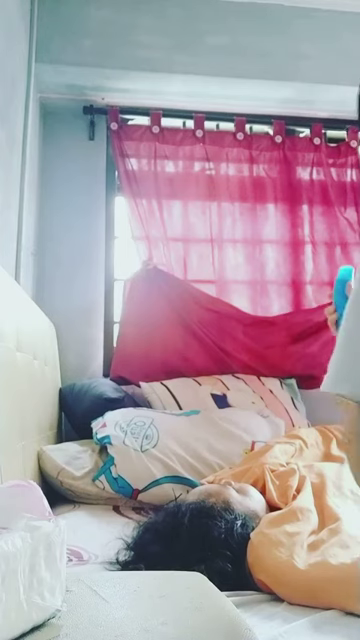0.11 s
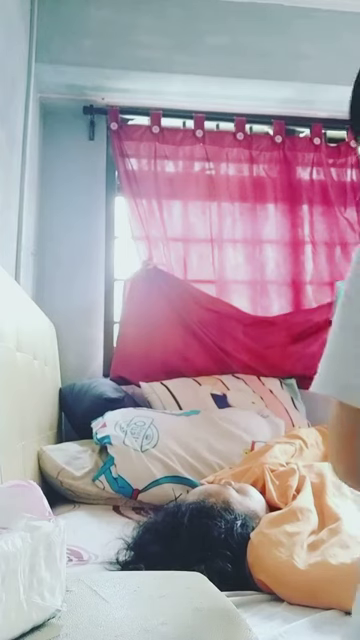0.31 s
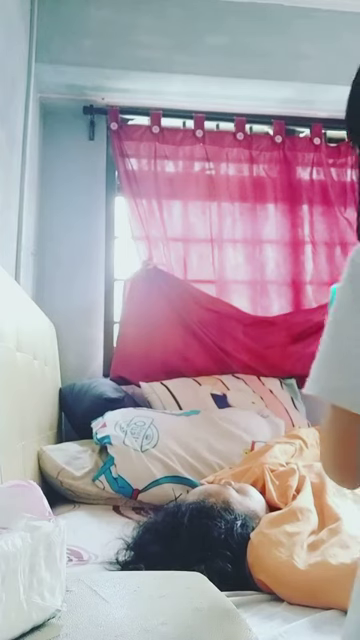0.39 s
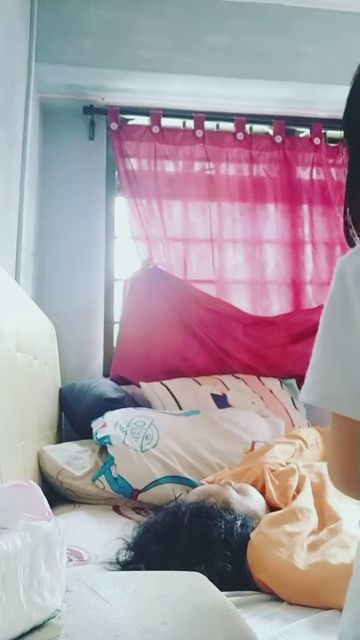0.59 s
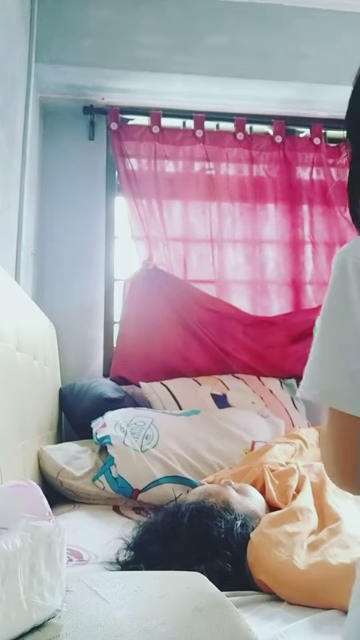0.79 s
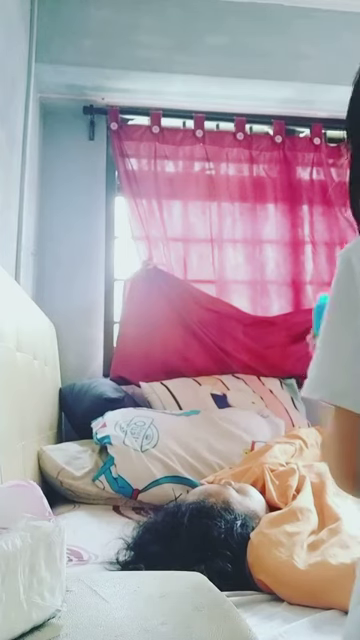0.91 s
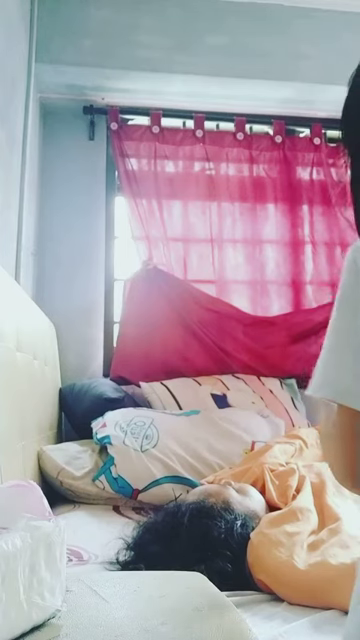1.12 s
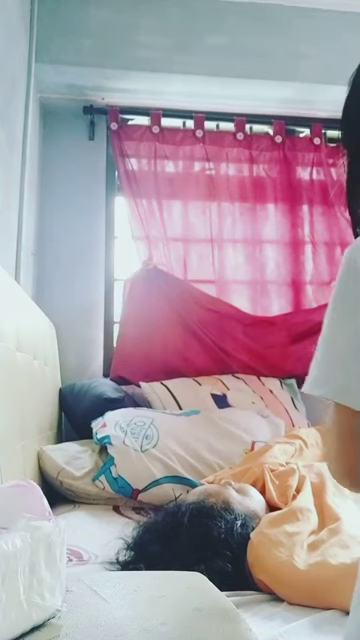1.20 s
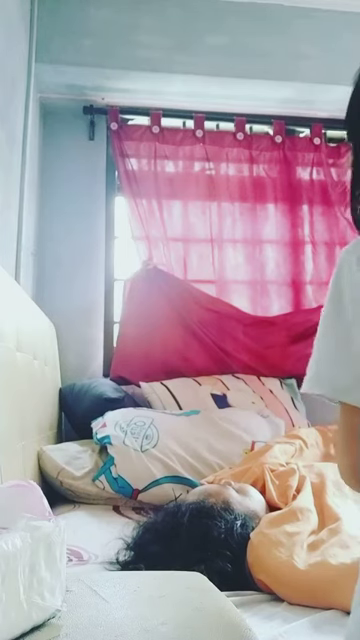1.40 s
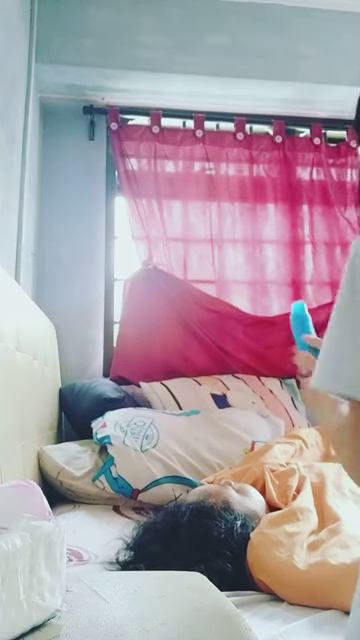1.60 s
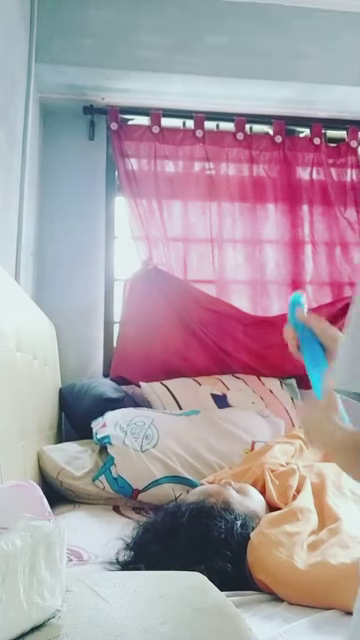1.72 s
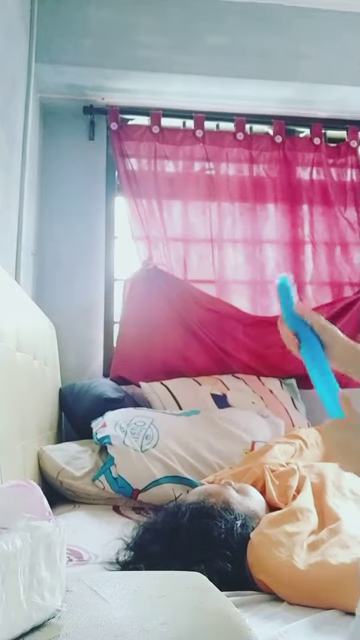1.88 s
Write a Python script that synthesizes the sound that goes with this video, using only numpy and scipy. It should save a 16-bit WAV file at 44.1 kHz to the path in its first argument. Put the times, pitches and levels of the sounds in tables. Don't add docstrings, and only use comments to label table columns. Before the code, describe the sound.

Corrugated plastic tube pops and clicks rapidly, pauses, then crackles again at a higher hollow pitch; short room reflections follow, with barely audible cloth rustle and low air hum, picked up close in a bedroom.

```python
import sys
import numpy as np
from scipy import signal
from scipy.fft import rfft, irfft, next_fast_len
from scipy.io import wavfile
from scipy.ndimage import map_coordinates

SR = 44100
rng = np.random.default_rng(int(sys.argv[2]) if len(sys.argv) > 2 else 0)


def wav_record(signal):
    frames = np.transpose(np.atleast_2d(signal))
    bounded = np.clip(frames, -1, 1)
    quanta = np.round(bounded * 32767).astype(np.int16)
    wavfile.write(sys.argv[1], SR, quanta)


def how_loud(loudness_db):
    steps = np.asarray(loudness_db, float) / 20
    return 10 ** steps


N = 83790

# start_s, peak_db, centre_hz, spread_octaves, fizz_db (against the peak)
RIDGE_SNAPS = [(0.2081, -22, 1200, 0.59, -23.5), (.213, -21.5, 5000, 1.7, -16.5),
               (0.2131, -4.5, 7600, 0.84, -10.5), (0.2324, -13.5, 2500, 0.87, -19.5),
               (.323, -38, 1200, 0.42, -25), (0.3356, -17.5, 2600, 0.84, -26.5),
               (0.3384, -19.5, 2470, .6, -33.5), (.3665, -2.5, 4040, 0.58, -34),
               (0.4646, -10, 5395, 0.62, -31), (0.4647, -14, 6300, .5, -30.5),
               (0.5292, -4, 3670, 0.47, -30.5), (0.5636, -8.5, 2995, 0.43, -39),
               (0.9893, -47, 6800, .5, -5), (1.021, -33, 5000, .3, -29.5), (1.0254, -11, 4200, 0.87, -14.5),
               (1.0394, -7, 2150, 1.46, -14.5), (1.1826, -23, 2530, 0.98, -15.5),
               (1.2299, -3, 4170, 0.59, -25.5), (1.3143, -19.5, 3700, 0.8, -25),
               (1.3751, -11.5, 2970, 0.39, -39), (1.403, -28.5, 2700, 0.16, -31),
               (1.407, -15.5, 2270, 0.77, -24.5), (1.6483, -41, 4300, 0.65, -11.5)]
# mode_hz, level_db, t60_s
WALL_MODES = [(605, 1, .016), (950, -1, 0.03), (1427, 4, 0.0058), (1972, 0.5, 0.014), (2600, 7.5, 0.0061),
              (3121, -9, 0.015), (3502, 4, 0.0064), (4200, 4, 0.0043), (4710, 6, 0.0041), (5400, -1, 0.01),
              (6188, 7.5, 0.0058), (6910, -3, 0.009), (7410, -1, 0.0067)]
# start_s, fundamental_db, second_overtone_db, upper_overtones_db
COLUMN_PUSHES = [(0.19, -42.5, -78, -73), (0.2083, -26.5, -32.5, -49), (0.2133, -18.5, -43, -37),
                 (.2325, -29.5, -37, -35.5), (.323, -29, -48, -43), (0.3337, -61, -55, -46),
                 (0.3662, -35.5, -69, -30.5), (0.5289, -36.5, -57, -40.5), (.5629, -31.5, -40, -51),
                 (0.9897, -41.5, -56, -84.5), (1.0255, -27.5, -30.5, -38.5), (1.0396, -20, -32.5, -34.5),
                 (1.1822, -27.5, -37.5, -48), (1.2302, -33, -37.5, -39.5), (1.3141, -43.5, -51.5, -48),
                 (1.3756, -41, -35, -60), (1.407, -36, -44, -39.5)]
# time_s, pitch_hz
COLUMN_PITCH = [(.19, 314.6), (.25, 353.8), (.33, 348.7), (.38, 364.3), (.55, 379.5), (1.0, 375),
                (1.06, 396), (1.19, 398.7), (1.32, 441), (1.42, 469.3), (1.5, 462)]
# multiple (of the pitch), level_db (in its group), t60_s
COLUMN_OVERTONES = [
    (1, 3.5, 0.19),
    (1.6, -4.5, 0.043),
    (2.04, 0, 0.16),
    (3.07, -18.5, 0.048),
    (4.08, 3, .12),
    (5.15, 0, 0.15),
]
# delay_s, left_db, right_db
WALL_SLAPS = [
    (.0013, 0, -4),
    (.009, -6, -9.5),
    (0.0162, -33.5, -36),
    (.021, -8, -11.5),
]
# frequency_hz, t60_s
ROOM_DECAY = [(300, 0.32), (1400, 0.26), (3700, 0.28), (10000, 0.24)]
# frequency_hz, level_db
ROOM_COLOUR = [(200, -6), (400, -9), (650, -1), (1200, 0.5), (2500, -3.5), (5000, -1.5), (12000, 1.5)]
# frequency_hz, likeness (0 to 1)
ROOM_LIKENESS = [(300, 0.91), (700, 0.72), (1500, 0.078), (4000, 0.029)]
# time_s, level_db
SLEEVE_STROKES = [
    [(0.0, -69), (0.054, -69), (0.112, -78), (0.116, -81), (0.19, -85)],
    [(0.72, -76), (0.756, -86.5), (0.9, -68.5), (0.972, -77.5), (0.982, -90), (0.985, -74)],
    [(1.56, -78.5), (1.638, -83), (1.644, -76), (1.778, -64), (1.858, -77.5), (1.9, -66.5)],
]
# frequency_hz, density_db (per Hz)
CLOTH_SPECTRUM = [(1470, -44), (2500, -32), (3260, -29.5), (4140, -30), (4440, -13.5), (5920, -4),
                  (8400, -15), (13000, -21), (16000, -9)]
# frequency_hz, density_db (per Hz)
HUM_SPECTRUM = [(15, -34), (25, -0.5), (133, -8), (270, -22), (533, -13), (629, -21.5), (823, -16.5),
                (1320, -21), (3500, -31), (4550, -111), (7700, -120)]
# frequency_hz, level_db
HUM_AT_LEFT = [(60, -15.5), (300, -18), (1650, -26), (3000, -1.5)]
# frequency_hz, likeness (0 to 1)
HUM_LIKENESS = [(60, 0.98), (200, 1), (600, 0.18), (1700, 0.14)]
# time_s, level_db
HUM_LEVEL = [(0, 1), (0.299, 1), (.55, 4), (0.801, 2), (1.1, 2.5), (1.35, 1.5), (1.6, -1.5), (1.9, 4.5)]


def unit_rms(x):
    return x / np.sqrt(np.mean(x ** 2) + 1e-20)


def along(points, hz):
    point_hz, value = np.transpose(points)
    return np.interp(np.log(hz + 1), np.log(point_hz + 1), value)


def over_time(points):
    return np.interp(np.arange(N) / SR, *np.transpose(points))


def wobble(rate_hz):
    knots = rng.standard_normal(int(N * rate_hz / SR) + 4)
    return map_coordinates(knots, [np.arange(N) * rate_hz / SR])


def filtered(x, response):
    size = next_fast_len(x.shape[-1] + 4096)
    spectrum = rfft(x, size) * response(np.fft.rfftfreq(size, 1 / SR))
    return irfft(spectrum, size)[..., :x.shape[-1]]


def stereo_noise(likeness, size):
    def shares(hz):
        angle = np.arccos(np.clip(along(likeness, hz), -1, 1)) / 2
        return np.array([np.cos(angle), np.sin(angle)])

    mid, side = filtered(rng.standard_normal((2, size)), shares)
    return np.array([mid + side, mid - side])


def damped_modes(cycles, level_db, t60_s, rise_s, t):
    decay = how_loud(level_db[:, None] - 60 * t / t60_s[:, None])
    onset = 1 - np.exp(-t / rise_s)
    return (decay * np.sin(2 * np.pi * cycles)).sum(0) * onset


def ridge_snap(peak_db, centre_hz, spread_octaves, fizz_db):
    t = np.arange(SR // 20) / SR
    mode_hz, level_db, t60_s = np.transpose(WALL_MODES)
    detune, scatter, phase = rng.standard_normal((3, len(mode_hz)))
    cycles = np.outer(mode_hz * (1 + 0.025 * detune), t) + 0.1 * phase[:, None]
    skirt_db = 8.5
    octaves = np.log2(mode_hz / centre_hz)
    near_db = -skirt_db * np.log2(1 + (octaves / spread_octaves) ** 2)
    wall = damped_modes(cycles, level_db + near_db + 1.5 * scatter, t60_s, rise_s=0.0002, t=t)

    fizz_hz, fizz_t60_s = 8800, 0.0076
    fizz = filtered(rng.standard_normal(len(t)), lambda hz: 1 / (1 + (fizz_hz / (hz + 1)) ** 6))
    fizz = fizz * how_loud(fizz_db - 60 * t / fizz_t60_s)
    return how_loud(peak_db) * (wall / np.abs(wall).max() + fizz)


def air_column(start_s, low_db, second_db, upper_db):
    t = np.arange(SR // 2) / SR
    multiple, level_db, t60_s = np.transpose(COLUMN_OVERTONES)
    pitch_hz = np.interp(start_s + t, *np.transpose(COLUMN_PITCH))
    cycles = np.outer(multiple, np.cumsum(pitch_hz) / SR)
    drive_db = level_db + np.array([low_db, low_db, second_db, upper_db, upper_db, upper_db])
    return damped_modes(cycles, drive_db, t60_s, rise_s=0.00035, t=t)


def tube():
    out = np.zeros((2, N + SR))
    for start_s, peak_db, centre_hz, spread, fizz_db in RIDGE_SNAPS:
        direct = ridge_snap(peak_db, centre_hz, spread, fizz_db)
        around = ridge_snap(peak_db, centre_hz, spread * 1.38, fizz_db)
        add_in_room(out, start_s, direct, around)
    for push in COLUMN_PUSHES:
        tone = air_column(*push)
        add_in_room(out, push[0], tone, how_loud(-4) * tone)

    def radiation(hz):
        u = 1j * hz / 291.6
        return (u ** 2 / (1 + 1.366 * u + u ** 2)) ** 2

    return filtered(out[:, :N], radiation)


def add_in_room(out, start_s, direct, around):
    for side, lag_s, level_db in [(0, 3 / SR, 0.5), (1, 0, -0.5)]:
        out[side, round((start_s + lag_s) * SR):][:len(direct)] += how_loud(level_db) * direct
    wet = signal.fftconvolve(around[None], bedroom(), axes=1)
    out[:, round(start_s * SR):][:, :wet.shape[1]] += wet


def bedroom():
    size, fill_s = SR // 2, 0.0074
    hz, t, bands = signal.stft(stereo_noise(ROOM_LIKENESS, size), SR, nperseg=256)
    decay = how_loud(-60 * t / along(ROOM_DECAY, hz)[:, None])
    answer = signal.istft(bands * decay, SR, nperseg=256)[1][:, :size]
    answer = answer * np.clip(np.arange(size) / SR / fill_s, 0, 1) ** 2
    answer = answer / np.linalg.norm(answer[0])
    for delay_s, *sides_db in WALL_SLAPS:
        arrival_s = delay_s + rng.normal(0, 0.0002, size=2)
        answer[[0, 1], np.round(arrival_s * SR).astype(int)] += how_loud(np.array(sides_db))
    return filtered(answer, lambda hz: how_loud(along(ROOM_COLOUR, hz)))


def sleeve():
    coarse_db = 1.8 * np.array([wobble(60), wobble(90)])
    fine_db = 3 * np.array([wobble(480), wobble(490)])
    grains = rng.standard_normal((2, N)) * how_loud(coarse_db + fine_db)
    hiss = filtered(grains, lambda hz: how_loud(along(CLOTH_SPECTRUM, hz)))
    return unit_rms(hiss) * how_loud(over_time(np.vstack(SLEEVE_STROKES)) + 14)


def hum():
    fan_hz, fan_width_hz, fan_db = 59.4, 8.2, 6.5

    def response(hz):
        fan = fan_db * np.exp(-((hz - fan_hz) / fan_width_hz) ** 2)
        sides_db = np.array([along(HUM_AT_LEFT, hz), 0 * hz])
        return how_loud(along(HUM_SPECTRUM, hz) + fan + sides_db)

    air = filtered(stereo_noise(HUM_LIKENESS, N), response)
    level_db = -55.5 + over_time(HUM_LEVEL) + 1.2 * wobble(6)
    return air / np.std(air[1]) * how_loud(level_db)


def scene():
    return tube() + sleeve() + hum()


def roll_off(x):
    return signal.sosfilt(signal.butter(12, 17140, fs=SR, output="sos"), x)


def record(dry):
    top_hz, bass_hz = 16000, 35
    mix = filtered(dry, lambda hz: (hz < top_hz) / (1 + (bass_hz / (hz + 1)) ** 4))
    return roll_off(mix)


dry = scene()
out = record(dry)
wav_record(out)
```